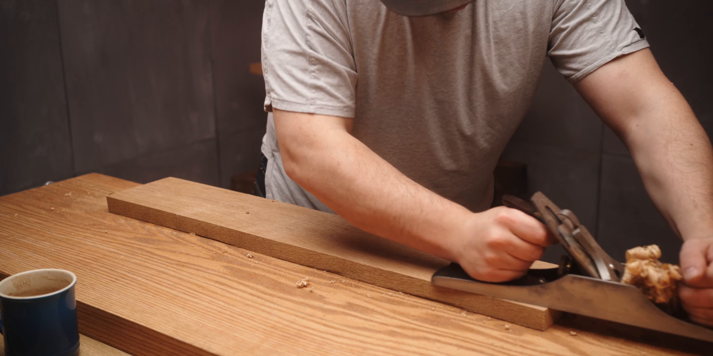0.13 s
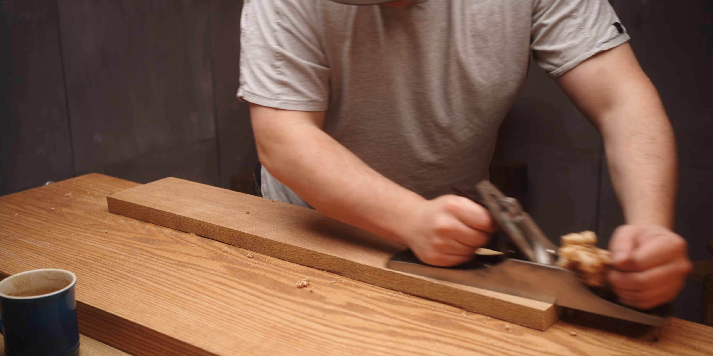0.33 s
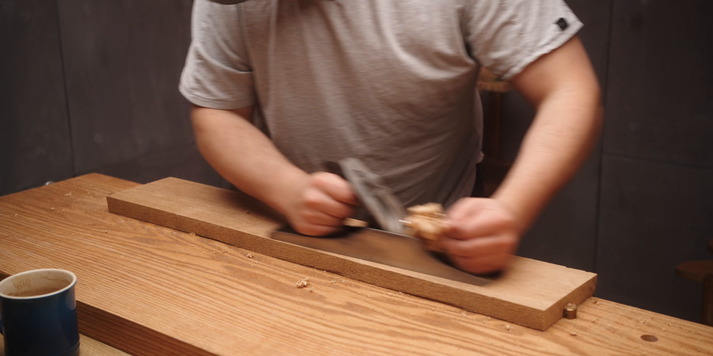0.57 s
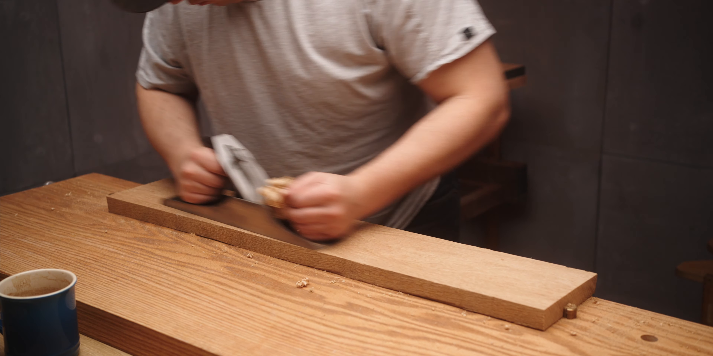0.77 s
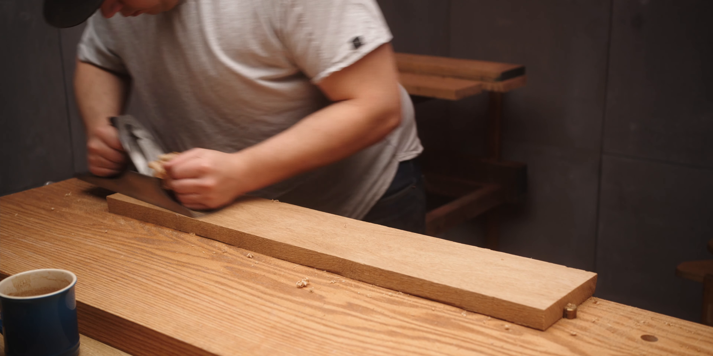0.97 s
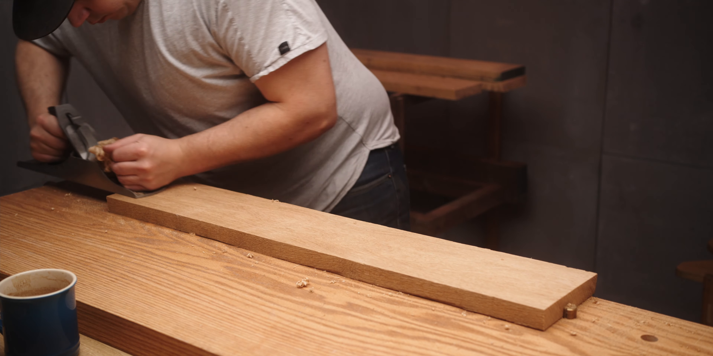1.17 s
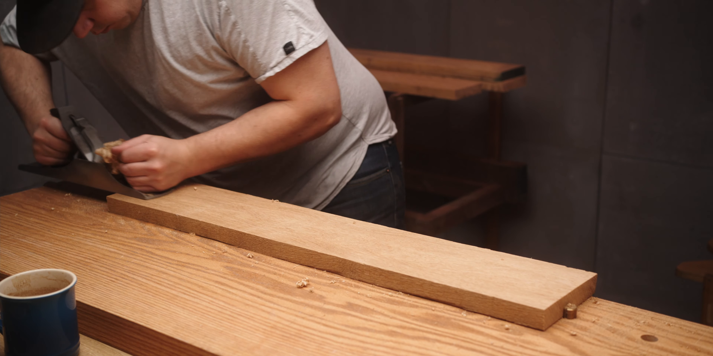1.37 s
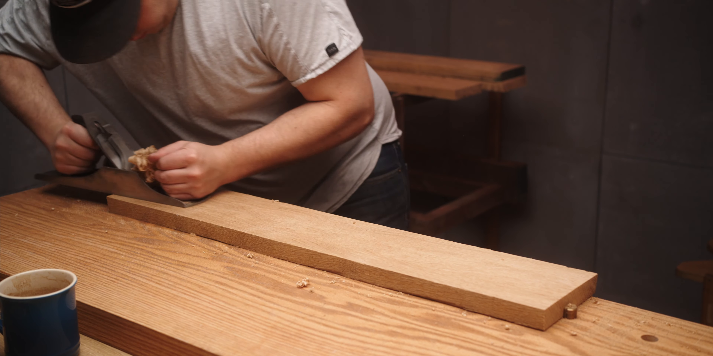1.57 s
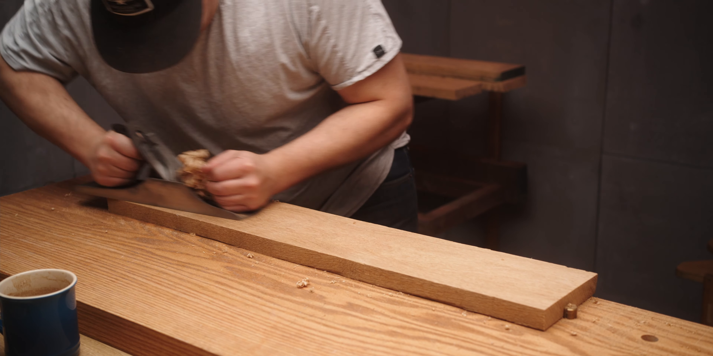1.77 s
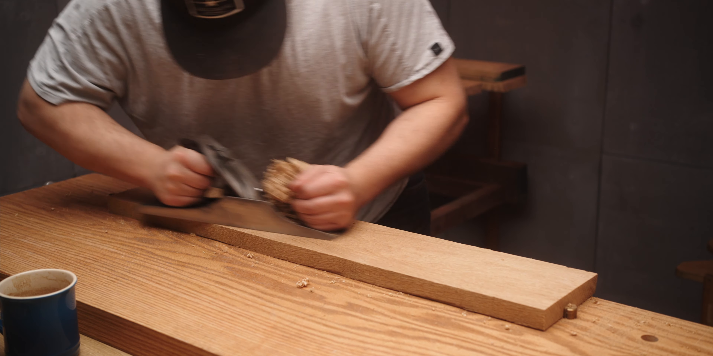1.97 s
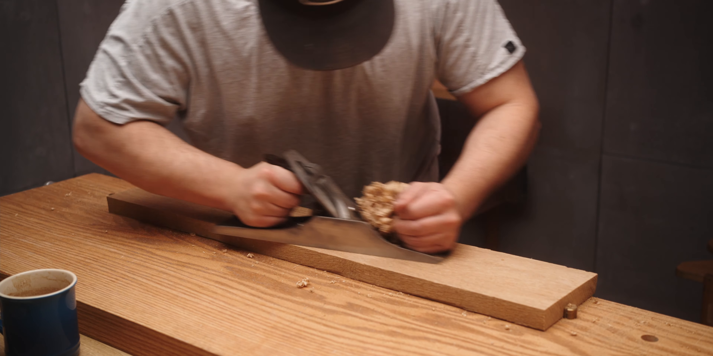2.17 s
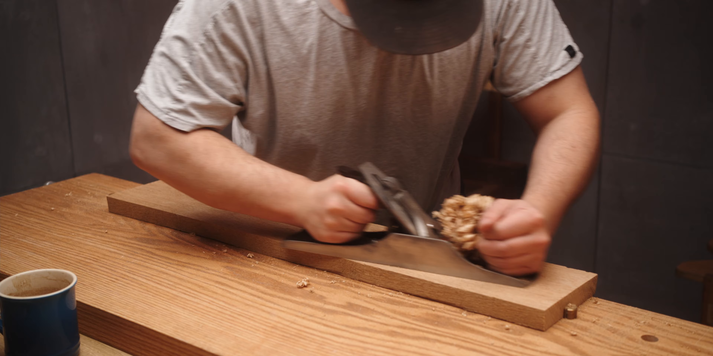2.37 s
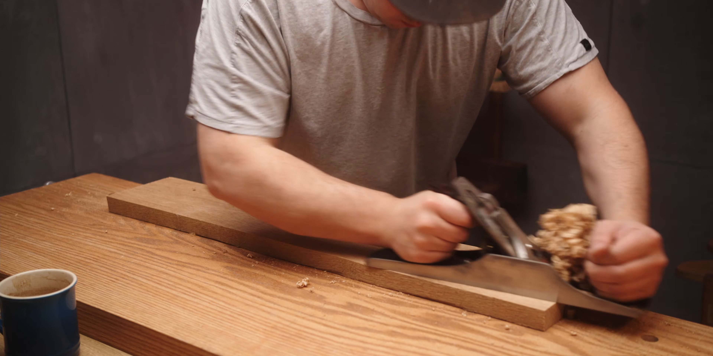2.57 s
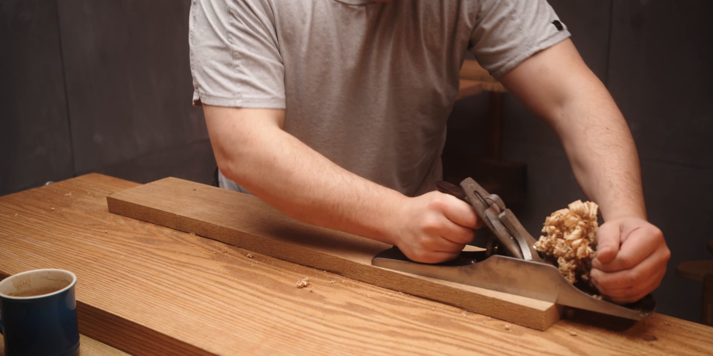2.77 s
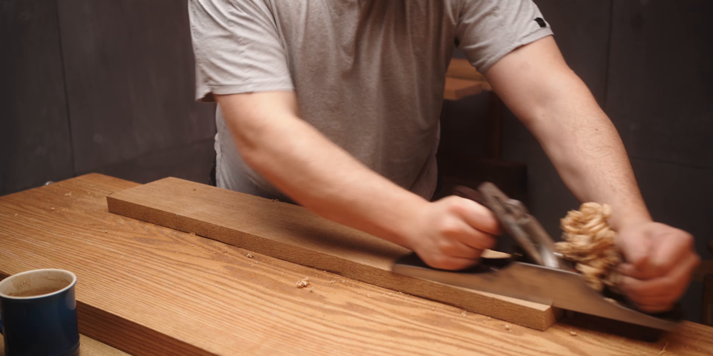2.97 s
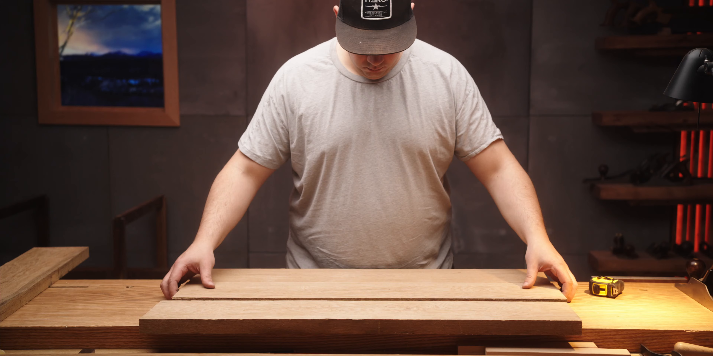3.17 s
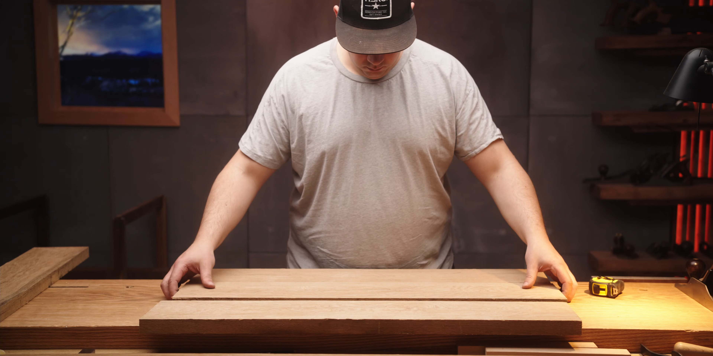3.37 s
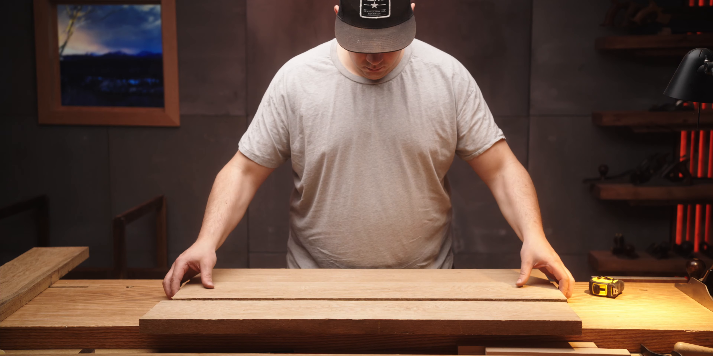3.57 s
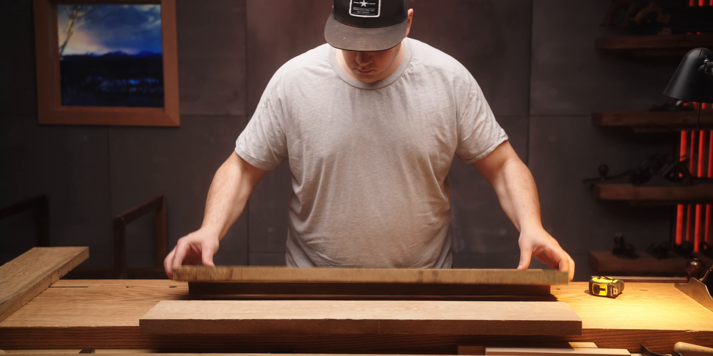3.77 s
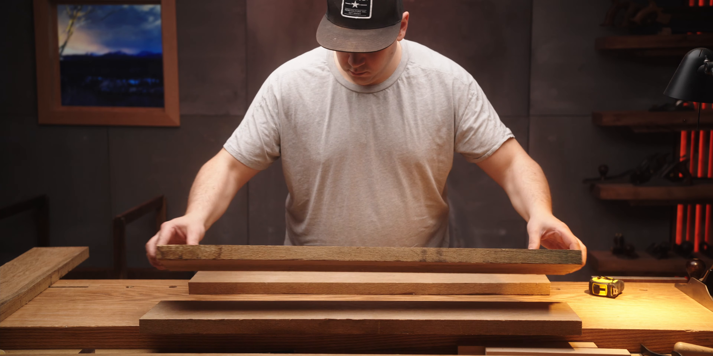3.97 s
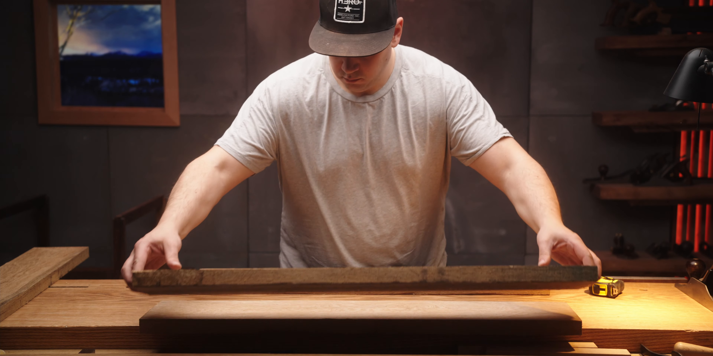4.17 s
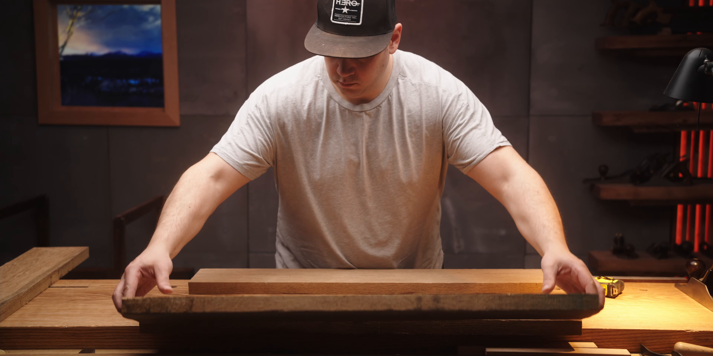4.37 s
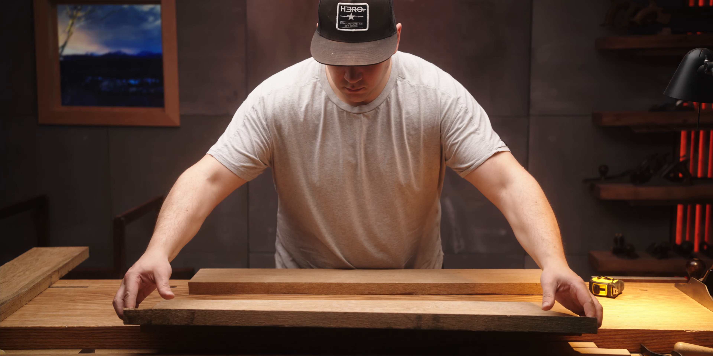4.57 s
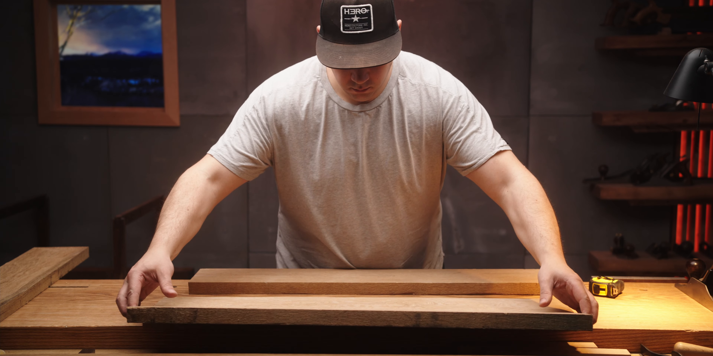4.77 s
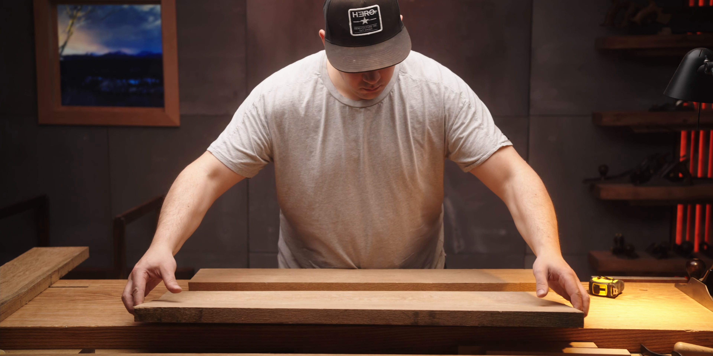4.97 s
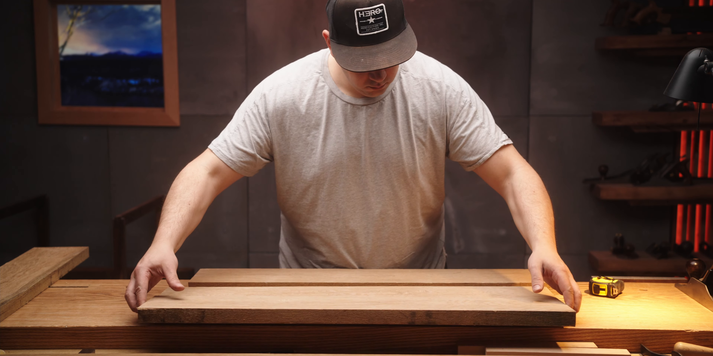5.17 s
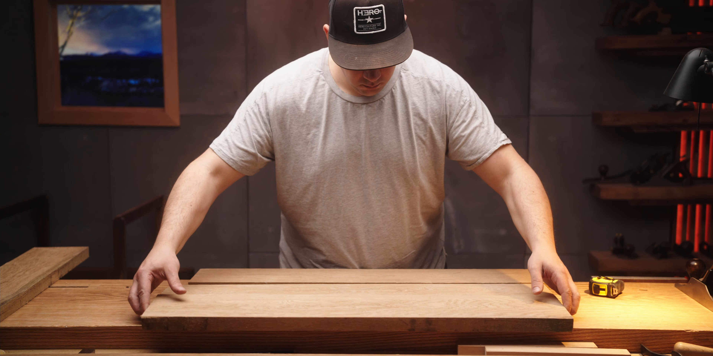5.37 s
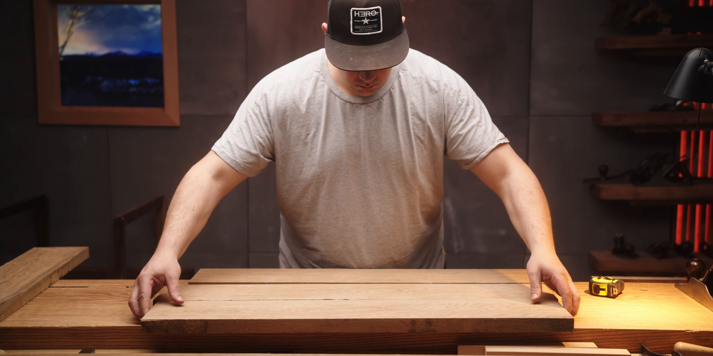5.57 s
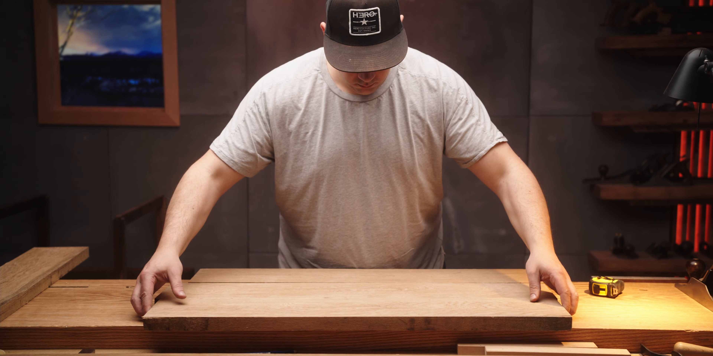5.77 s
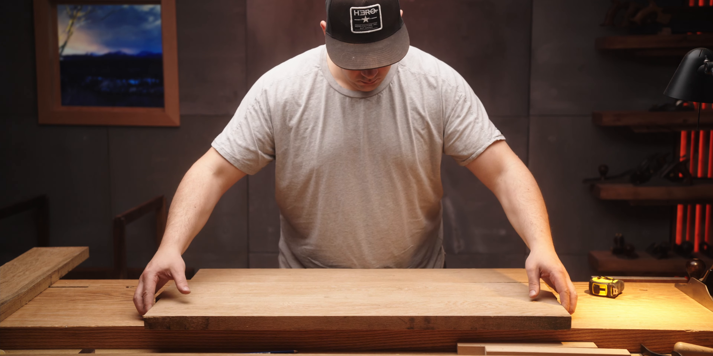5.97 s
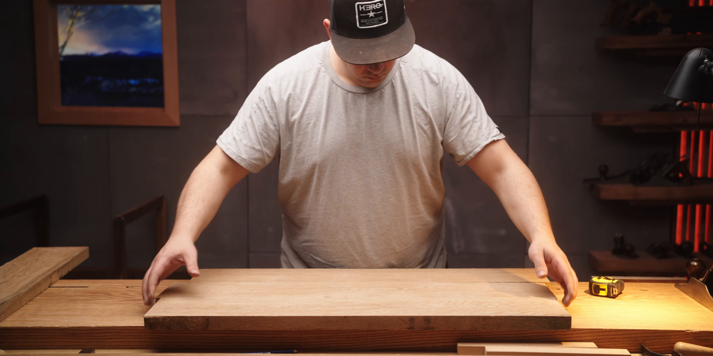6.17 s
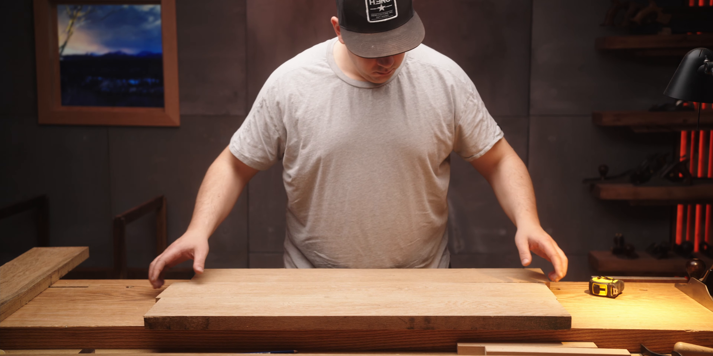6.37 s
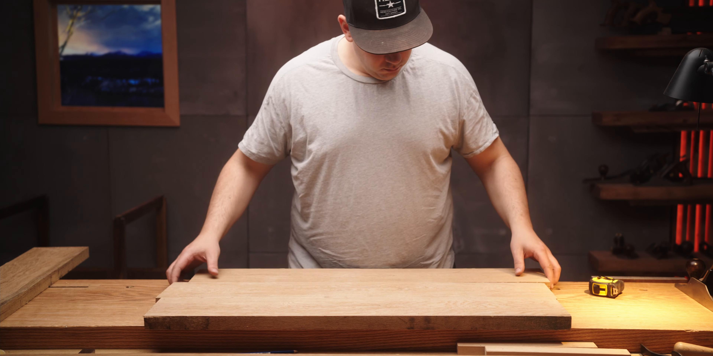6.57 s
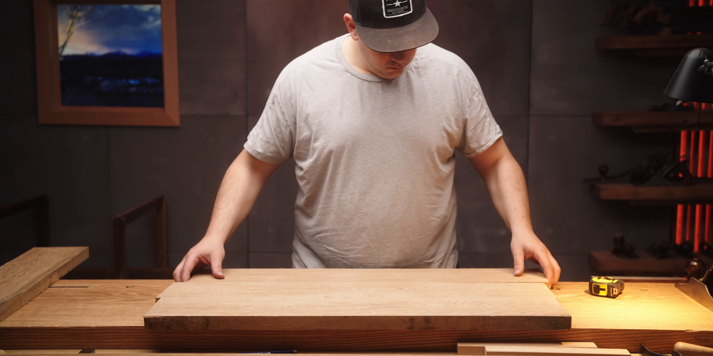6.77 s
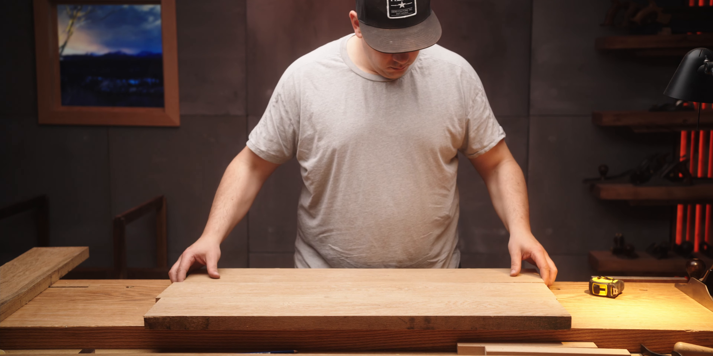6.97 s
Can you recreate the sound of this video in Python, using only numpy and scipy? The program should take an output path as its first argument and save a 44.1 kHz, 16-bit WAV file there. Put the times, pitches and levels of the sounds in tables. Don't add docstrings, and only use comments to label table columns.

```python
import sys
import numpy as np
from scipy import signal
from scipy.fft import rfft, irfft, next_fast_len
from scipy.io import wavfile
from scipy.ndimage import uniform_filter1d, map_coordinates

SR = 44100
rng = np.random.default_rng(int(sys.argv[2]) if len(sys.argv) > 2 else 0)


def log_audio(samples):
    frames = np.atleast_2d(samples).T
    limited = np.clip(frames, -1, 1)
    pcm = np.round(limited * 32767).astype(np.int16)
    wavfile.write(sys.argv[1], SR, pcm)


def how_loud(loudness_db):
    steps = np.asarray(loudness_db, float) / 20
    return 10 ** steps


N = 309582
LEAD = 22050
T = (np.arange(N + LEAD) - LEAD) / SR
EDITS = [3.174, 4.528]


def plane():
    # (frequency [Hz], width [Hz], level [dB])
    iron = [(4050, 100, -12.5), (5910, 830, -10.5), (5900, 110, -19.5), (9000, 72, -10),
            (11300, 280, -13.5), (12900, 23, -15.5)]
    # (frequency [Hz], width [Hz])
    blade = (2900, 110)
    # (frequency [Hz], density [dB per Hz])
    tear_hue = [(710, -38.5), (1200, -33), (1880, -23.5), (2540, -11.5), (2840, -5), (3500, -2.5),
                (4500, 2), (6530, -13.5), (7480, -18), (9000, -20), (11700, -49.5), (19800, -120)]
    fine_hue = [(3820, -37.5), (6500, -0.5), (7500, -13), (9130, -5.5), (10300, -16.5), (11700, -8.5),
                (14000, -11.5), (15600, -21.5)]
    sole_hue = [(59, -25), (100, -8.5), (227, -15.5), (302, -8.5), (396, -9), (948, -9), (1180, -7.5),
                (2600, -5), (3380, -47), (5720, -120)]

    def steel(f):
        return 1 + 0.3 * sum(how_loud(db / 4) * mode(c, 200 + 1.5 * w)(f) for c, w, db in iron)

    gains, pan_db = gestures()
    chatter = how_loud(4.1 * wobble(160) + 1.1 * wobble(30))
    tear = chatter * fibres(7000, spread_db=5.5, smooth=0.9)
    cut = patchy(coloured(filtered(tear, steel), tear_hue), depth_db=0.7)
    ring = how_loud(-2.5 + 1.4 * wobble(16)) * unit(filtered(tear, mode(*blade)))
    fluff = chatter * fibres(4000, spread_db=9.5, smooth=0.35)
    fine = how_loud(1.2 * wobble(22)) * patchy(coloured(filtered(fluff, steel), fine_hue), depth_db=1.9)
    sole = how_loud(3.5 * wobble(29.825)) * coloured(fibres(2000, spread_db=2.5, smooth=0.76), sole_hue)
    dry_plane = (gains * [cut, fine, sole, ring]).sum(axis=0)
    return shop(dry_plane, wet_db=5.0, gap_s=0.004, lag=7.5) * how_loud(np.outer([0.5, -0.5], pan_db))


def gestures():
    # (time [s], pressure [dB], curl of the shaving [dB])
    strokes = [
        [(0.0, -42.5, 11), (0.03, -38.5, 1)],
        [(0.2, -60, 8), (0.3, -59.5, 2.5), (0.44, -52, 0.5)],
        [(0.453, -46, -1), (0.48, -40, -4), (0.515, -44, -0.5), (0.72, -41.5, 1.5), (0.89, -41.5, 3),
         (1.03, -42.5, -2.5), (1.175, -45.5, -3), (1.2, -58, -4.5)],
        [(1.42, -70, 0), (1.505, -57.5, 0), (1.519, -45, -3)],
        [(1.52, -31.5, -2), (1.59, -45, -6), (1.74, -36, 0.5), (1.99, -38.5, 7), (2.075, -35, 6.5),
         (2.33, -39.5, 5.5), (2.5, -35.5, -0.5), (2.64, -32, 5), (2.69, -43.5, -7.5)],
        [(2.992, -54, 4), (3.008, -36, -1.5), (3.03, -39, 2), (3.045, -62, 1), (3.17, -65, 5)],
    ]
    # (fine fibres [dB], sole rumble [dB], its drift [dB per s], blade ring [dB],
    # left-right [dB])
    grips = [(-17.5, -14, 3, -40, 0), (-15.5, -4, -25, -4, 1), (-14, -4, -6, -6, 2),
             (-20, -14.5, -5, -12, 5), (-12.5, -16.5, 2, -7, 2), (-14.5, -5, -20, -11, 1.5)]
    curl_damps = 1.4
    sole_lags = 0.43
    gains, pan_db = np.zeros((4, len(T))), np.zeros(len(T))
    for rows, (fine_db, sole_db, drift_db, ring_db, side_db) in zip(strokes, grips):
        s, db, curl_db = np.transpose(rows)
        started = T > (s[0] or -1)
        moving = uniform_filter1d(1. * (started & (T < s[-1])), size=200)
        press, curl = np.interp(T, s, db), np.interp(T, s, curl_db)
        drift = drift_db * np.clip(T - s[0], 0, 2)
        relative_db = np.array([
            0 * T,
            fine_db + curl,
            sole_db + drift - sole_lags * (press - db.mean()),
            ring_db - curl_damps * curl])
        gains += moving * how_loud(press + relative_db)
        pan_db[started] = side_db
    return gains, uniform_filter1d(pan_db, size=2000)


def fibres(rate_hz, spread_db, smooth):
    breaks = rng.random(len(T)) < rate_hz / SR
    snaps = breaks * how_loud(spread_db * rng.random(len(T))) * rng.standard_normal(len(T))
    return unit(snaps) + smooth * rng.standard_normal(len(T))


def patchy(x, depth_db):
    z = signal.stft(x, nperseg=512)[2]
    field = uniform_filter1d(rng.standard_normal(z.shape), size=12, axis=0)
    field = uniform_filter1d(field, size=18, axis=1)
    return unit(signal.istft(z * how_loud(depth_db * unit(field)), nperseg=512)[1][:len(x)])


def mode(c, w):
    return lambda f: 1j * f * w / (c * c - f * f + 1j * f * w)


def knocks():
    # (time [s], peak [dB], slap [dB], brightness [dB per octave], ring t60 [s])
    blow_rows = [
        (1.512, -50, -30, -1.5, 0.11),
        (2.995, -39.5, -25, 8, 0.13),
        (3.648, -65, -30.5, -3, 0.14),
        (3.725, -46, -29.5, 3.5, 0.18),
        (4.531, -50.5, -14, 3, 0.078),
        (4.650, -23, -17, -2, 0.074),
        (5.472, -32, -10, -2.5, 0.074),
        (5.529, -17.5, -8.5, 0.7, 0.054),
        (5.554, -19.5, -28.5, -4, 0.093),
        (6.231, -57, -32, 5, 0.1),
    ]
    # (frequency [Hz], level [dB], t60 [s], not used)
    wood = [
        [(590, -2, .3), (636, 8, .3), (734, -10, .3)],
        [(119.6, 10.5, 0.8), (291, -4, 5.0), (519, -16.5, 0.6), (760, -41, 5.0), (947, -17, 5.0),
         (1436, -38, 2.9)],
        [(262, -1, 0.036), (296, -12, 0.073), (530.5, 12.5, 0.3), (742, 8, 0.69), (940, -5, 1),
         (1200, -49, 0.82), (1402, -10, 3.4), (1980, -55, 5.0), (2015, -40, 1.5)],
        [(453, -8, 5.0), (978, 15.5, 0.04), (1020, -8, 0.096), (1340, -26, 1.7), (1580, -34, 0.24),
         (2060, -33.5, 5.0)],
        [(285, -20, 0.089), (444, -42.5, 5.0), (555, -26, 0.42), (734, -3, 0.42), (920, -17, 0.08),
         (988, 5.5, 0.46), (1300, -41, 0.31), (1463, -8, 0.24), (1657, -20, 0.31), (2020, -37.5, 0.69),
         (2155, -36, 0.22), (2450, -39.5, 0.38)],
        [(808, 5, 0.32), (1510, -7.5, 1.1), (1640, -9, 0.17), (2020, -3, 0.42)],
    ]
    pieces = [0, 0, 1, 1, 1, 2, 3, 4, 4, 5]
    # (frequency [Hz], density [dB per Hz])
    crack = [(60, -59.5), (150, -17), (260, -5), (550, -0.5), (1000, -4.5), (1600, -10), (2200, -19),
             (5000, -19.5), (9200, -37.5), (15500, -59)]
    # (time after first touch [s], level [dB])
    bounces = [(.002, 0.5), (.005, .6), (.0125, -0.7), (.025, -8.5)]
    out, t = np.zeros(len(T) + SR), np.arange(16384) / SR
    for (s, db, slap_db, tilt_db, t60), piece in zip(blow_rows, pieces):
        colour = [(hz, level + tilt_db * np.log2(hz / 700)) for hz, level in crack]
        slap = struck(colour, size=len(t))
        slaps = np.zeros(len(t))
        for k, (late_s, part_db) in enumerate(bounces):
            slaps += (-1) ** k * how_loud(part_db - 13.5) * np.pad(slap, (round(late_s * SR), 0))[:len(t)]
        rough = coloured(rng.standard_normal(len(t)), colour)
        rough = rough * how_loud(-9 - 60 * t / 0.12) * (1 - np.exp(-t / 0.0031))
        ring = np.zeros(len(t))
        for hz, level, _ in wood[piece]:
            mode_t60 = t60 * (700 / hz) ** 0.1
            ring += how_loud(0.48 * level - 60 * t / mode_t60) * np.sin(2 * np.pi * hz * t)
        ring = ring / np.abs(ring).max() * (1 - np.exp(-t / 0.0014))
        blow = ring + how_loud(slap_db + 11.5) * (slaps + rough)
        out[LEAD + round(s * SR):][:len(t)] += how_loud(db + 2.5) * blow
    return out[:len(T)]


def struck(spectrum, size):
    c = irfft(np.log(how_loud(along(spectrum, np.fft.rfftfreq(size, 1 / SR)))), size)
    c = np.r_[c[0], 2 * c[1:size // 2], np.zeros(size // 2)]
    blow = irfft(np.exp(rfft(c)), size)
    return blow / np.abs(blow).max()


def slides():
    # (time [s], length [s], rub [dB], fingertip fizz [dB], plank rumble [dB])
    slide_rows = [(3.616, 0.097, -76.5, -9.5, -6.5), (3.702, 0.14, -68.5, -28, 0),
                  (4.524, 0.13, -72.5, -22, -1), (4.692, 0.37, -61, -25, 5), (4.945, 0.27, -55, -10.5, -3),
                  (5.164, 0.32, -59, -11.5, -2.5), (5.706, 0.27, -65, -17, 5.5),
                  (5.95, 0.35, -73.5, -15, -5.5), (6.484, 0.25, -78, -8.5, -25),
                  (6.695, .14, -73.5, -8, -8), (6.837, 0.2, -66.5, -24, 0)]
    # (frequency [Hz], density [dB per Hz])
    rub_hue = [(710, -40.5), (1200, -51), (1400, -1), (2220, -3.5), (2390, -2.5), (4010, 6.5), (6090, -1.5),
               (6790, -5), (10500, -16.5), (13600, -56), (22000, -120)]
    plank_hue = [(59, -42.5), (100, 1.5), (172, -9.5), (285, 1.5), (364, -4.5), (517, -1), (1170, -7),
                 (2200, -13), (2860, -20), (4840, -120)]
    fizz_hue = [(7000, -60), (9000, -7), (10500, -8), (11800, -2), (13500, -2), (15600, -7)]
    rise, fall = 0.28, 0.43
    rub, fizz, plank = np.zeros((3, len(T)))
    for s, length_s, db, fizz_db, plank_db in slide_rows:
        u = (T - s) / length_s
        speed = how_loud(db) * np.clip(np.minimum(u / rise, (1 - u) / fall), 0, 1) ** 0.5
        rub += speed
        fizz += how_loud(fizz_db) * speed
        plank += how_loud(plank_db) * speed
    grit = how_loud(0.75 * wobble(40)) * fibres(2500, spread_db=-7, smooth=0.59)
    brush = how_loud(0.5) * coloured(fibres(700, spread_db=3.5, smooth=1.3), fizz_hue)
    return rub * coloured(grit, rub_hue) + fizz * brush + plank * coloured(grit, plank_hue)


def ticks():
    # (time [s], peak [dB], frequency [Hz])
    tick_rows = [(4.959, -65, 8364), (5.0325, -52, 14580), (5.19, -60.5, 13140), (5.3298, -49, 12830),
                 (5.4823, -51.5, 8440), (5.7418, -64.5, 9250), (5.7755, -64, 11900), (5.8636, -62, 8800),
                 (5.9244, -65, 8380), (6.4916, -62.5, 12520)]
    t60 = 0.0016
    out, t = np.zeros(len(T) + SR), np.arange(SR // 50) / SR
    for s, db, hz in tick_rows:
        out[LEAD + round(s * SR):][:len(t)] += how_loud(db + 13.5 - 60 * t / t60) * np.sin(2 * np.pi * hz * t)
    return out[:len(T)]


def thumps():
    # (time [s], peak [dB], frequency [Hz], t60 [s], dull puff [dB])
    push_rows = [(0.453, -57.5, 136, 0.16, -16), (0.866, -37, 110, 0.15, -4), (0.941, -43.5, 97, 0.11, 0),
                 (1.197, -52, 78, 0.15, -19), (1.513, -41, 92, 0.18, -7), (1.58, -63, 74.5, 0.28, 7),
                 (3.649, -64, 109.4, 0.28, 1.5), (3.739, -51.5, 113, 0.34, -6),
                 (4.528, -59.5, 118.3, 0.14, -3.5), (4.644, -44.5, 118, 0.16, 1.5),
                 (5.479, -42, 107, 0.15, -15), (5.524, -45.5, 94.2, 0.33, 0), (5.718, -48.5, 51, 0.2, -11),
                 (5.949, -57.5, 53.5, 0.16, 1)]
    # (frequency [Hz], density [dB per Hz])
    puff_hue = [(15, -33.5), (40, -10.5), (80, 5), (130, -8), (300, -7), (600, -34), (1200, -120)]
    out, t = np.zeros(len(T) + SR), np.arange(SR // 2) / SR
    for s, db, hz, t60, puff_db in push_rows:
        puff = how_loud(puff_db) * coloured(rng.standard_normal(len(t)), puff_hue)
        swing = np.sin(2 * np.pi * hz * t) + puff
        decay = how_loud(db + 7.5 - 60 * t / t60) * (1 - np.exp(-t / 0.017))
        out[LEAD + round(s * SR):][:len(t)] += decay * swing
    return out[:len(T)]


def swings():
    # (time [s], peak [dB], frequency [Hz], width [s])
    swells = [
        (4.042, -46, 47.8, 0.045),
        (4.142, -55.5, 55.7, 0.043),
        (4.38, -60, 30.4, 0.1),
    ]
    return sum(how_loud(db) * bump(s, width_s) * np.sin(2 * np.pi * hz * (T - s)) for s, db, hz, width_s in swells)


def room_tone():
    quiet_db = [-74, -83.5, -82]
    air_db = [-73, -64, -74.5]
    # (frequency [Hz], density [dB per Hz])
    quiet_hue = [(60, -40), (100, -6), (220, -8), (300, -3), (425, -4), (520, -9), (1200, -10), (2400, -15),
                 (4500, -15), (9000, -22), (15600, -28)]
    rumble_hue = [(11, -20.5), (18, 1.5), (60, 0), (73, -14.5), (81, -33), (110, -50.5), (140, -76),
                  (240, -120)]
    # (time [s], level [dB], width [s])
    gusts = [
        (0.0, -66, 0.13),
        (1.799, -66, .2),
        (4.04, -53.5, 0.029),
        (4.33, -69.5, 0.065),
        (4.55, -76, 0.16),
        (5.58, -69, 0.092),
        (6.8, -72, 0.25),
        (7.02, -66, 0.03),
    ]
    # (frequency [Hz], rms [dB])
    mains = [(59.5, -76), (120, -96.5), (301, -85.5)]
    part = np.searchsorted(EDITS, T)
    hiss = how_loud(np.array(quiet_db)[part]) * paired(coloured(rng.standard_normal((2, len(T))), quiet_hue))
    air = how_loud(np.array(air_db)[part]) + sum(how_loud(db) * bump(s, width_s) for s, db, width_s in gusts)
    rumble = air * how_loud(0.75 * wobble(21)) * coloured(rng.standard_normal(len(T)), rumble_hue)
    hum = sum(how_loud(db - 0.5 + 2.5 * wobble(9.4)) * np.sin(2 * np.pi * hz * T) for hz, db in mains)
    return np.sqrt(2) * hiss + rumble + hum


def shop(x, wet_db, gap_s, lag):
    # (frequency [Hz], t60 [s])
    reverb = [(100, 0.79), (500, 0.72), (2000, 0.58), (6000, 0.49), (12000, 0.31)]
    hop = 8192
    out, padded = np.zeros((2, len(x) + 4 * SR)), np.pad(x, (hop, 2 * hop))
    for i in range(-hop, len(x), hop):
        if np.abs(x[max(i, 0):i + 2 * hop]).max() < 1e-7:
            continue
        hz, t, z = signal.stft(rng.standard_normal((2, 30000)), SR, nperseg=256)
        decay = how_loud(-60 * t / along(reverb, hz)[:, None])
        tail = signal.istft(z * decay, SR, nperseg=256)[1]
        piece = padded[i + hop:i + 3 * hop] * np.hanning(2 * hop) ** 0.5
        echo = signal.fftconvolve(piece[None], tail / np.linalg.norm(tail[0]), axes=1)
        out[:, i + hop:i + hop + echo.shape[1]] += echo
    late = hop - round(gap_s * SR)
    wet = how_loud(wet_db) * paired(out[:, late:late + len(x)])
    direct = filtered(x, lambda hz: np.exp(1j * np.pi * np.outer([lag, -lag], hz) / SR))
    return (direct + wet) / np.hypot(1, how_loud(wet_db))


def paired(x):
    # (frequency [Hz], correlation [-1 to 1])
    alike = [(60, 0.95), (150, .93), (300, .7), (600, 0.25), (1200, 0), (12000, 0.23)]

    def mid_side(hz):
        turn = np.arccos(np.clip(along(alike, hz), -1, 1)) / 2
        return np.array([np.cos(turn), np.sin(turn)])

    mid, side = filtered(x, mid_side)
    return np.array([mid + side, mid - side])


def unit(x):
    return x / np.sqrt(np.mean(x ** 2) + 1e-20)


def along(points, hz):
    f, v = np.transpose(points)
    return np.interp(np.log(hz + 1), np.log(f + 1), v)


def filtered(x, response):
    m = next_fast_len(x.shape[-1] + 8192)
    return irfft(rfft(x, m) * response(np.fft.rfftfreq(m, 1 / SR)), m)[..., :x.shape[-1]]


def coloured(x, spectrum):
    return unit(filtered(x, lambda hz: how_loud(along(spectrum, hz))))


def wobble(rate_hz):
    knots = rng.standard_normal(int(len(T) * rate_hz / SR) + 4)
    return map_coordinates(knots, [np.arange(len(T)) * rate_hz / SR])


def bump(s, width_s):
    return np.exp(-0.5 * ((T - s) / width_s) ** 2)


def scene():
    first = T < EDITS[0]
    blows = knocks()
    planing = plane() + shop(blows * first, wet_db=6, gap_s=0.0019, lag=5)
    planing = planing * uniform_filter1d(1. * first, size=150)
    planks = shop(blows * ~first + slides() + ticks(), wet_db=2.5, gap_s=0.0033, lag=3.62)
    return (planing + planks + thumps() + swings() + room_tone())[:, LEAD:]


def low_pass(x):
    return signal.sosfilt(signal.butter(12, 15720, fs=SR, output="sos"), x)


def record(dry):
    # (frequency [Hz], left-right [dB])
    ports = [(60, 2.5), (500, -0.5), (2000, 0), (8000, -1.5), (13000, 5)]
    top_hz = 15720
    mix = filtered(dry, lambda hz: how_loud(np.outer([0.5, -0.5], along(ports, hz))) * (hz < top_hz))
    return low_pass(mix)


dry = scene()
out = record(dry)
log_audio(out)
```